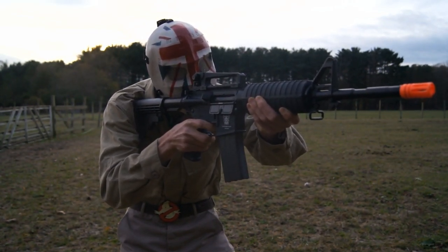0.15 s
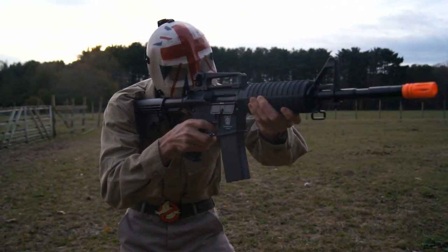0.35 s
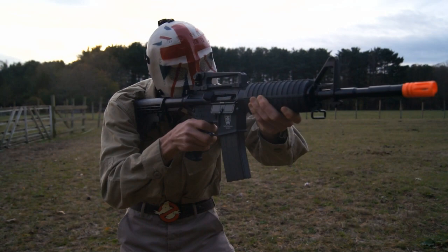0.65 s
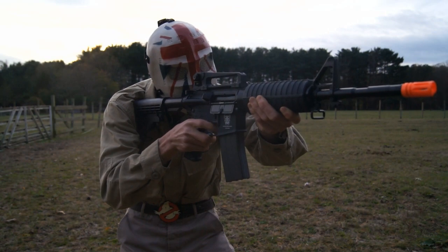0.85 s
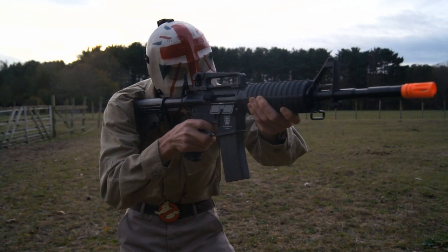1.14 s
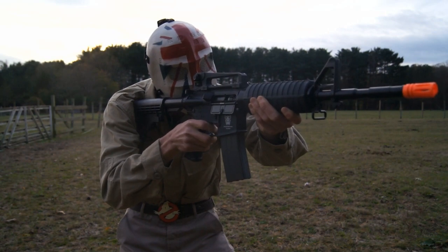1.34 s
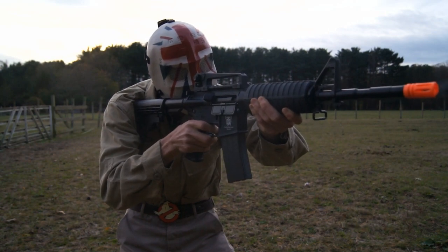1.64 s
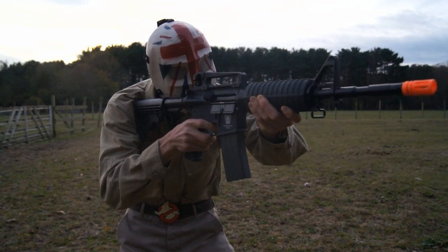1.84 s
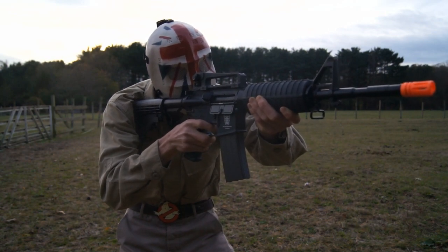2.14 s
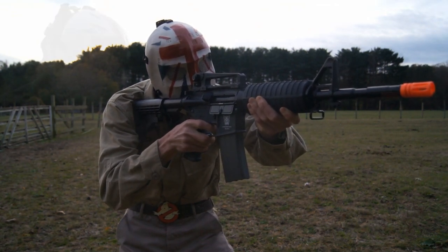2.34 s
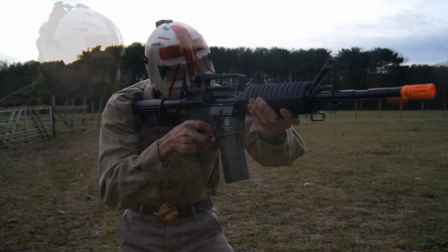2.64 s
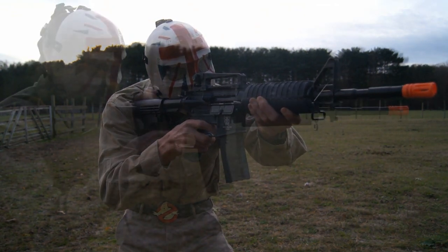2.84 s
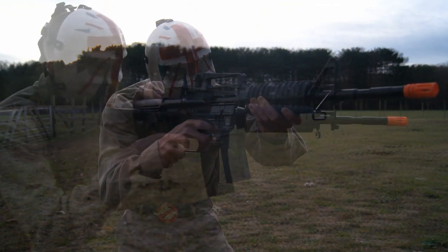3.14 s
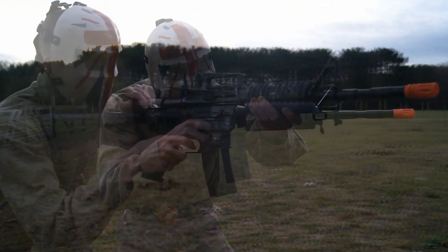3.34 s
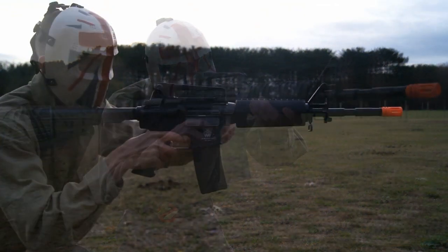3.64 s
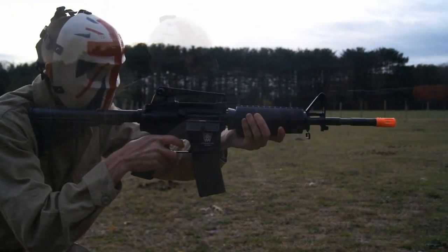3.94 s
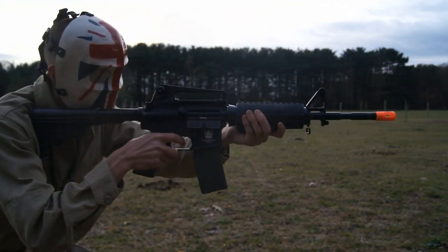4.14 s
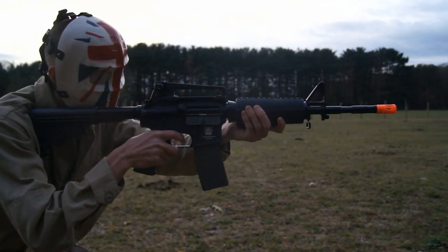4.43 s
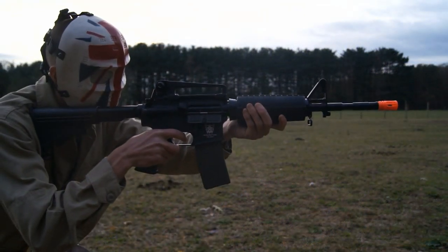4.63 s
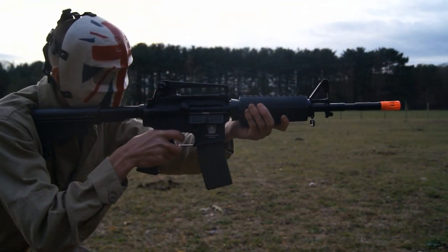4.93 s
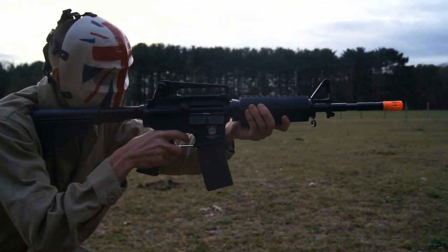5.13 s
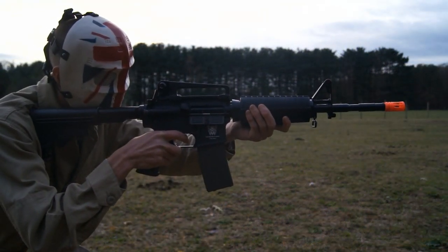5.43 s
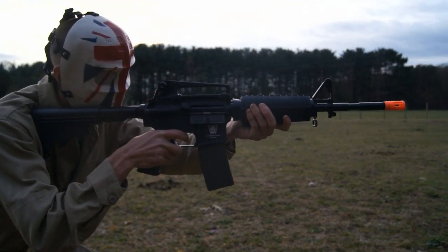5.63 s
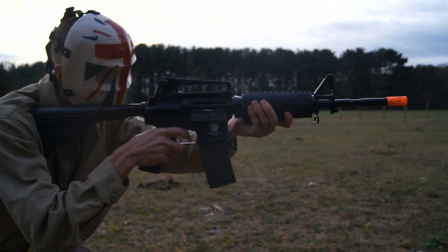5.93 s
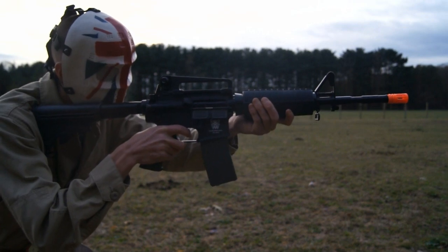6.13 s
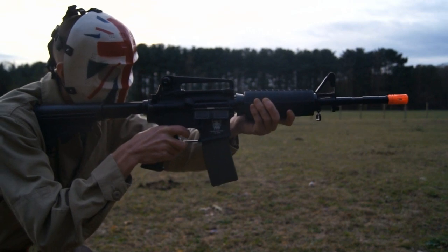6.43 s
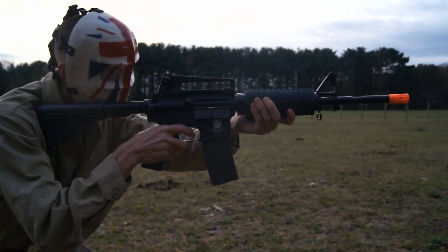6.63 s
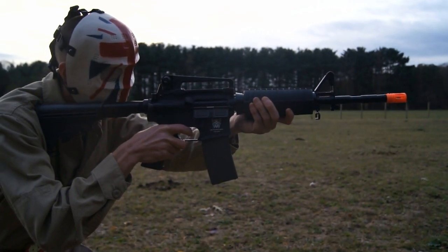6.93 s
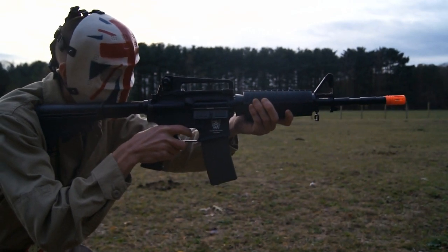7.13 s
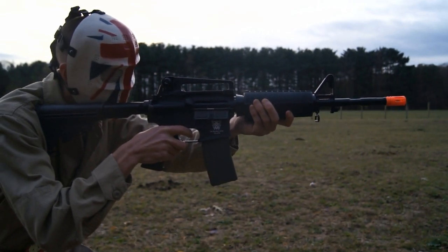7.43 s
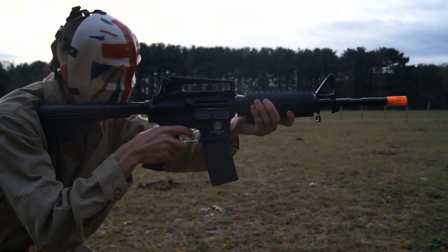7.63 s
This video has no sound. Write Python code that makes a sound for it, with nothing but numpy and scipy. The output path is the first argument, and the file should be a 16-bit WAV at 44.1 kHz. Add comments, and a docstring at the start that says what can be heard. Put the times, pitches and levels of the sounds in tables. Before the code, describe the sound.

An airsoft rifle clacks once at the start, rattles off two quick bursts, is cocked by hand, then fires two spaced single shots in an open field.

```python
"""In an open field, a gas blowback airsoft rifle cycles once, fires two short bursts, is cocked by hand, then fires two
single shots. Each shot is a hammer blow, a rush of gas and a bolt hitting its rear stop and slamming home: shaped noise
for the blows, gas and scrapes, fading sine waves for the ringing metal. The trigger clacks back after the single shots.
The field answers with a faint tail of fading noise, over a low outdoor rumble of filtered noise.
A microphone notches the sound and rounds its peaks."""
import sys
import numpy as np
from scipy import signal
from scipy.fft import rfft, irfft, next_fast_len
from scipy.io import wavfile
from scipy.ndimage import uniform_filter1d, map_coordinates

SR = 44100
rng = np.random.default_rng(int(sys.argv[2]) if len(sys.argv) > 2 else 0)


def int16_out(signal):
    """Quantize to a 16-bit WAV file."""
    q = np.round(np.clip(np.atleast_2d(signal).T, -1, 1) * 32767)
    wavfile.write(sys.argv[1], SR, q.astype(np.int16))


N = 342657  # length in samples
HZ = np.fft.rfftfreq(8192, 1 / SR)  # frequencies at which filters are drawn
T = np.arange(round(.25 * SR)) / SR  # time inside one short sound, s

# Event levels are set before the layer trims in the functions; spectra and modes hold relative levels.
# one cycle of the action per shot: [hammer t/s, hammer strength/dB, rear stop t/s, stop strength/dB,
# bolt home t/s, home strength/dB, gas level/dB, gas lead before the hammer/s, hollow body boost/dB]
SHOT_CYCLES = [(.004, -16, .012, -17, .0442, 0, -40, .004, -2),
               (.509, -2, .531, 0, .5706, 0, -23, .005, 1.5), (.581, 0, .6037, -3, .6418, 0, -27, .006, 1),
               (.6532, -2, .677, -16, .7194, 0, -28, .006, 0),
               (.7291, 0, .753, -17, .7882, 0, -30, .006, -1),
               (.795, 0, .8176, 0, .8578, -1, -33, .004, -1), (1.3754, 0, 1.398, 1, 1.437, 0, -28, .005, 0),
               (1.443, -3, 1.476, -9, 1.5166, 1, -28, .004, 0),
               (1.5276, -3, 1.55, -15, 1.5916, -1, -27, .006, -1),
               (1.6013, 2, 1.6247, -15, 1.6664, -1, -27, .006, -2),
               (1.676, 1, 1.7037, -12, 1.7232, -9, -27, .006, -3),
               (1.7304, -2, 1.7539, 2, 1.7941, -1, -24, .011, 2),
               (4.9031, 0, 4.914, 1, 4.9517, 0, -23, .008, 5),
               (6.4865, 0, 6.5032, 1, 6.5408, 1, -24, .005, 4)]
# contacts at each stage: [delay/s, steel crack level/dB, receiver knock level/dB, low thump level/dB]
# the hammer strikes the valve and rebounds
HAMMER_CONTACTS = [(0, -16.7, -22.3, -37), (.006, -29.5, -29.5, -42.5)]
# the bolt hits the buffer and rebounds
REAR_STOP_CONTACTS = [(0, -14.8, -26, -27.5), (.0055, -24.5, -27.3, -41.5)]
# the bolt slams shut, chatters and settles
HOME_CONTACTS = [(0, -12.7, -26.5, -42), (.005, -25, -30, -44), (.012, -38, -32, -49),
                 (.028, -39, -42, -62)]
# loss for each dB of a weaker blow: [crack loss/dB, knock loss/dB, thump loss/dB]
SOFTENING = (1, .75, 1.4)

# the trigger resetting after a single shot: [t/s, click level/dB, hollow knock level/dB, steel crack level/dB]
TRIGGER_RESETS = [(5.0666, -21.3, -23, -33), (6.659, -22.3, -21.5, -33)]
# single ticks of loose parts and pellets, loud and faint, at set times: [t/s, level/dB]
SET_TICKS = [(.1453, -32), (.242, -39), (.2738, -43.5), (.3331, -37.5), (1.0135, -48.5), (1.0499, -40),
             (1.3517, -51), (1.855, -45), (2.069, -46), (3.07, -61), (3.2224, -53), (3.783, -56)]
# spells of chance ticking: [t/s, length/s, level/dB]
TICK_SPELLS = [(.11, .29, -48), (1.0, .12, -51), (1.88, .32, -53)]
# the rifle shifting in the hands: [t/s, level/dB, length/s]
HAND_RATTLES = [(.0, -39, .06), (.1, -55, 0.091), (.26, -57.5, 0.13), (2.077, -46, 0.043),
                (3.215, -57, 0.06), (3.59, -58, .05)]
# the charging handle knocking along its track: [t/s, steel crack level/dB, receiver knock level/dB, thump level/dB]
HANDLE_BLOWS = [(3.247, -39.5, -41.5, -54), (3.2738, -35, -34, -59), (3.296, -23.3, -22.5, -52),
                (3.305, -34, -26, -48), (3.516, -32, -27, -56), (3.5206, -20, -16.5, -59),
                (3.531, -20.5, -24, -55)]
# the handle sliding back, then forward: [t/s, level/dB, length/s]
HANDLE_SLIDES = [(3.27, -46, .026), (3.503, -35, .053)]
# the handle ringing as it is pulled and let go: [t/s, level/dB]
HANDLE_RINGS = [(3.2965, -35), (3.531, -27)]
# the handle's release jolting the stock: [t/s, level/dB]
STOCK_JOLTS = [(3.519, -43)]
# level of the outdoor air: [t/s, level/dB]
AIR_LEVEL = [(0, -55), (2.2, -55.5), (3.0, -59), (3.6, -57), (7.8, -56.7)]
# single soft low buffets at set times: [t/s, level/dB, length/s]
SET_BUFFETS = [(2.08, -60, .04), (2.32, -52.5, 0.033), (2.55, -57, .095), (3.21, -55.5, 0.2)]
# spells of fainter chance buffets: [t/s, length/s, level/dB]
BUFFET_SPELLS = [(2.0, 1.6, -62), (4.3, 1.7, -62.5)]

# ringing of the spring and bolt carrier: [f/Hz, level/dB, t60/s], t60 being the time to fade by 60 dB
SPRING_MODES = [(3015, -4.5, .12), (3978, -3.5, 0.094), (4660, -3, .1), (5190, 5, .11), (6870, -7, 0.11),
                (7290, -1.5, 0.091), (8900, -9, .11), (10900, -10.5, .12), (10900, -7, 0.078)]
# ringing of the hollow receiver and magazine: [f/Hz, level/dB, t60/s]
RECEIVER_MODES = [(420, -13, 0.016), (800, 0, 0.029), (995, 2, 0.031), (1176, 1, 0.022), (1860, -11, 0.028)]
# ringing of the trigger housing: [f/Hz, level/dB, t60/s]
HOUSING_MODES = [(530, -17.5, 0.031), (827, -4, 0.032), (1000, 1, 0.022), (1171, -2, .028),
                 (1775, -10.5, 0.023)]
# ringing of the charging handle: [f/Hz, level/dB, t60/s]
HANDLE_MODES = [(1040, -2, .09), (1650, -3, .12), (2750, -6, .06), (3305, -7, .06), (4760, -11, .06),
                (5200, -3, .06)]

# crack of steel on steel: [f/Hz, level per Hz/dB]
CRACK_SPECTRUM = [(200, -50), (900, -14), (1700, -6.5), (2800, 2.5), (4100, 2.5), (5500, -3.5), (7000, -5),
                  (8500, -12), (12500, -15), (16000, -29.5)]
# knock on the receiver: [f/Hz, level per Hz/dB]
KNOCK_SPECTRUM = [(150, -34), (400, -12), (750, -1.5), (1100, 1), (1900, -1), (3000, -20.5), (6000, -42.5)]
# low thump of a blow: [f/Hz, level per Hz/dB]
THUMP_SPECTRUM = [(25, -27), (80, -24), (160, -13), (270, -6), (390, 3), (550, 0), (900, -17.5),
                  (2500, -44.5)]
# hiss of gas, also used for feeding and hand rattles: [f/Hz, level per Hz/dB]
HISS_SPECTRUM = [(40, -23.5), (150, -26), (400, -4), (1000, 5), (1900, 3), (4200, -2.5), (7000, -5),
                 (9000, -9.5), (13000, -14.5), (16000, -25)]
# click of the trigger: [f/Hz, level per Hz/dB]
CLICK_SPECTRUM = [(500, -27), (2000, -15), (2700, -11), (3150, -5), (3550, -10), (4050, 5), (4450, 1),
                  (4800, -11), (6500, -12.5), (9000, -23), (15000, -32)]
# tick of small loose parts: [f/Hz, level per Hz/dB]
TICK_SPECTRUM = [(500, -23), (2500, -14), (4500, -1.5), (6500, -0.5), (9000, -7), (13000, -10.5),
                 (16000, -18.5)]
# scrape of sliding metal, also used for the spring's buzz: [f/Hz, level per Hz/dB]
SCRAPE_SPECTRUM = [(150, -23), (400, -7.5), (900, 1), (1900, -1), (3000, 0), (4400, 1), (5800, -5),
                   (7100, -5), (8200, -13), (11000, -13), (16000, -29)]
# shove of the stock: [f/Hz, level per Hz/dB]
SHOVE_SPECTRUM = [(25, 0), (70, 0), (130, -3), (220, -9), (500, -30), (1500, -55)]
# distant outdoor wash: [f/Hz, level per Hz/dB]
AIR_SPECTRUM = [(25, -9.5), (90, -15.5), (210, -5), (450, -5), (800, 1), (1100, -3.5), (1500, -10.5),
                (2000, -15.5), (2900, -13.5), (3700, -18), (4500, -13), (5300, -22.5), (9000, -33),
                (16000, -43.5)]
# soft low buffets: [f/Hz, level per Hz/dB]
BUFFET_SPECTRUM = [(40, -8), (110, -8), (190, 5.5), (330, -0.5), (480, -3.5), (900, -46)]

# tone of the field's answer: [f/Hz, level/dB]
FIELD_TONE = [(100, -9.5), (400, -0.5), (1000, -0.5), (4500, -2), (9000, 4), (15000, -7.5)]
# fading of the field's answer: [f/Hz, t60/s]
FIELD_T60 = [(100, .5), (1000, 0.78), (4000, 0.75), (8000, 0.44), (15000, 0.32)]
# left-right likeness of the rifle: [f/Hz, likeness/0-1]
RIFLE_LIKENESS = [(50, .7), (130, .85), (300, .97), (700, .95), (1300, .86), (2200, .72), (3500, .33),
                  (7000, .3), (15000, .42)]
# left-right likeness of the air and the tail: [f/Hz, likeness/0-1]
AIR_LIKENESS = [(40, .4), (130, 0.5), (300, 0.74), (700, .85), (1400, 0.55), (3100, 0.16), (10000, .1)]
# where the rifle stands: [t/s, lead of the right ear/s, right over left/dB]
RIFLE_PLACE = [(2.5, 0.0000037, 0.5), (3.5, 0, -0.5)]
# microphone balance: [f/Hz, left over right/dB]
MIC_BALANCE = [(60, -3.5), (200, -2), (800, 0.95), (2400, -0.5), (4400, -1.45), (8000, -0.5), (15000, -5)]
# microphone notches: [f/Hz, width/Hz, level/dB]
MIC_NOTCHES = [(606, 70, -7), (1375, 130, -11.5), (2373, 160, -12), (3436, 230, -6)]
EDGE_HZ = 16600  # upper limit of the microphone's sound

GAS_S = .015  # the gas flows this long before dying away
SLIDE_DB, SLIDE_FOLLOW = -37, .25  # bolt scrape; its dB per dB of the blow at the rear stop
JOSTLE_DB, JOSTLE_SPREAD_DB = -32.5, 4.5  # light contacts of the travelling bolt; spread either way
FEED_DB, FEED_LEAD_S, FEED_S = -27.5, .006, .007  # pellet feeding; lead is before the bolt is home
SPRING_DB, SPRING_DAMPED_DB, REFIRE_S = -37.5, -2, .02  # extra dB if the next hammer falls within REFIRE_S
BUZZ_DB, BUZZ_S = -46, .035  # spring coils buzzing against the tube
SHOVE_DB, SHOVE_FOLLOW = -63, 3.7  # shove on the shoulder; its dB per dB of hollow body boost
TICKS_PER_S, TICK_SPREAD_DB = 16, 3
BUFFETS_PER_S, BUFFET_SPREAD_DB, BUFFET_S = 3, 1.5, .035
HOUSING_LOW_HZ = 450  # low cut that keeps the housing's ring free of low thump

# the columns of the shot cycles, one value per shot
HAMMER_S, HAMMER_DB, STOP_S, STOP_DB, HOME_S, HOME_DB, GAS_DB, GAS_LEAD_S, BODY_DB = np.transpose(SHOT_CYCLES)
EACH_SHOT = np.ones(len(SHOT_CYCLES))
REFIRED = np.r_[HAMMER_S[1:], np.inf] - HOME_S < REFIRE_S  # the next shot follows at once


def amp(db):
    """Turns decibels into gain."""
    return 10 ** (np.asarray(db) / 20)


def read(points, hz):
    """Reads a table's value at hz, along a log-frequency axis."""
    f, value = np.transpose(points)
    return np.interp(np.log(hz + 1), np.log(f + 1), value)


def add(mix, s, sound):
    """Lays a sound into the mix at time s."""
    part = mix[:, max(round(s * SR), 0):][:, :sound.shape[-1]]
    part += sound[..., :part.shape[1]]


def causal(x, db):
    """Filters by a dB curve over HZ; nothing sounds ahead of an attack."""
    log_gain = np.log(amp(np.r_[db, db[-2:0:-1]]))
    # the phase that belongs to this loudness curve when sound leaves as early as possible
    response = np.exp(np.conj(signal.hilbert(log_gain)))
    taps = irfft(response[:len(HZ)])
    return signal.oaconvolve(x, taps[None, :len(HZ)], axes=1)[:, :N]


def colour(x, spectrum):
    """Gives white noise a spectrum and keeps its power."""
    db = read(spectrum, HZ)
    return causal(x, db - 10 * np.log10(np.mean(amp(db) ** 2)))


def pair(x, likeness):
    """Blends two unrelated signals so that left and right are as alike as the table says at each frequency."""
    size = next_fast_len(N, True)
    same = np.clip(read(likeness, np.fft.rfftfreq(size, 1 / SR)), 0, 1)
    gains = np.sqrt([(1 + same) / 2, (1 - same) / 2])
    mid, side = irfft(rfft(x, size) * gains, size)[:, :N]
    return np.array([mid + side, mid - side])


def scattered(spells, per_s, spread_db):
    """Spreads chance events loosely through each spell, as rows of (t/s, level/dB)."""
    rows = []
    for start, length, db in spells:
        place, strength = rng.random((40, 2)).T
        after = (np.arange(len(place)) + place) / per_s
        levels = db + spread_db * (2 * strength - 1)
        rows += list(np.c_[start + after, levels][after < length])
    return np.reshape(rows, (-1, 2))


def strikes(rows, spectrum, fall_s, rattle_db, rattle_s, shared_db=-20):
    """Each blow is a dense clatter that dies fast, then a weaker rattle; the same parts give blows a shared grain."""
    out, t = np.zeros((2, N)), T[:len(T) // 2]
    shape = np.exp(-t / fall_s) + amp(rattle_db) * np.exp(-t / rattle_s)
    shared = amp(shared_db) * rng.standard_normal((2, len(t)))
    clatter = shape * (shared + rng.standard_normal((len(rows), 2, len(t))))
    blows = colour(clatter.reshape(-1, len(t)), spectrum)
    # every blow carries the same energy before its own level
    blows *= np.linalg.norm(shape) / np.linalg.norm(blows, axis=1, keepdims=True)
    for (s, db), blow in zip(rows, blows.reshape(len(rows), 2, -1)):
        add(out, s, amp(db) * blow)
    return out


def rushes(rows, spectrum, rise_s, fall_s, grain_db, size):
    """Noise opens quickly, sputters for its length and dies away; size is the sputter's smoothing in samples."""
    out = np.zeros((2, N))
    for s, db, length in rows:
        shape = (1 - np.exp(-T / rise_s)) * np.exp(-np.maximum(T - length, 0) / fall_s)
        wander = np.sqrt(size) * uniform_filter1d(rng.standard_normal(len(T)), size)
        sputter = amp(grain_db * wander)
        sputter /= np.sqrt(np.mean(sputter ** 2))
        add(out, s, amp(db) * shape * sputter * rng.standard_normal((2, len(T))))
    return colour(out, spectrum)


def rings(rows, modes, scatter, rise_s):
    """Blows ring a set of fading sine waves, with pitches scattered a little each time."""
    out = np.zeros((2, N))
    hz, mode_db, t60 = np.transpose(modes)[:, :, None]
    t = T[T < t60.max()]
    size = amp(mode_db) / np.linalg.norm(amp(mode_db))
    shape = size * (1 - np.exp(-t / rise_s)) * np.exp(-np.log(1000) * t / t60)
    for s, db in rows:
        pitch = hz * (1 + scatter * rng.standard_normal(hz.shape))
        turns = pitch * t + rng.random((2, *hz.shape))
        ring = (shape * np.sin(2 * np.pi * turns)).sum(1)
        ring *= np.linalg.norm(shape) / np.linalg.norm(ring, axis=1, keepdims=True)
        add(out, s, amp(db) * ring)
    return out


def outdoors():
    """A nearly steady distant wash of filtered noise with soft low buffets."""
    level_db = np.interp(np.arange(N) / SR, *np.transpose(AIR_LEVEL))
    air = amp(level_db) * colour(rng.standard_normal((2, N)), AIR_SPECTRUM)
    chance = scattered(BUFFET_SPELLS, BUFFETS_PER_S, BUFFET_SPREAD_DB)
    rows = SET_BUFFETS + [(s, db, BUFFET_S) for s, db in chance]
    buffets = rushes(rows, BUFFET_SPECTRUM, rise_s=.01, fall_s=.015, grain_db=2.3, size=400)
    return pair(air + buffets, AIR_LIKENESS)


def handling():
    """Loose parts and pellets tick, and the rifle rattles as it shifts in the hands."""
    rows = np.vstack([SET_TICKS, scattered(TICK_SPELLS, TICKS_PER_S, TICK_SPREAD_DB)])
    ticks = amp(2) * strikes(rows, TICK_SPECTRUM, fall_s=.0012, rattle_db=-14.5, rattle_s=0.014)
    return ticks + rushes(HAND_RATTLES, HISS_SPECTRUM, rise_s=.006, fall_s=0.023, grain_db=3.5, size=130)


def gas_rush():
    """Gas let out by the valve rushes in turbulent noise, starting just ahead of the hammer's main blow."""
    rows = np.c_[HAMMER_S - GAS_LEAD_S, GAS_DB, GAS_S * EACH_SHOT]
    return rushes(rows, HISS_SPECTRUM, rise_s=.004, fall_s=.004, grain_db=4.5, size=70)


def contacts(stage, times, force_db):
    """Lists one stage of every shot as blows; a hollow body lifts knock and thump."""
    shift = np.c_[times, np.outer(force_db, SOFTENING) + np.outer(BODY_DB, [0, 1, 1])]
    return np.vstack([shift + contact for contact in stage])


def impacts(blows):
    """Metal hits metal: a steel crack, a knock that rings the receiver, and a low thump."""
    crack_rows, knock_rows, thump_rows = blows[:, [0, 1]], blows[:, [0, 2]], blows[:, [0, 3]]
    crack = strikes(crack_rows, CRACK_SPECTRUM, fall_s=.0017, rattle_db=-16, rattle_s=.010, shared_db=-3.5)
    knock = strikes(knock_rows, KNOCK_SPECTRUM, fall_s=.0028, rattle_db=-15, rattle_s=.016)
    body = rings(knock_rows, RECEIVER_MODES, scatter=0.04, rise_s=0.00058)
    thump = strikes(thump_rows, THUMP_SPECTRUM, fall_s=0.0049, rattle_db=-20, rattle_s=.012)
    return amp(3) * crack + amp(-.4) * knock + amp(-1) * thump + amp(-.6) * body


def hammer_and_bolt():
    """The hammer strikes the valve, then the bolt hits its rear stop and slams home."""
    hammer = contacts(HAMMER_CONTACTS, HAMMER_S, HAMMER_DB)
    rear_stop = contacts(REAR_STOP_CONTACTS, STOP_S, STOP_DB)
    home = contacts(HOME_CONTACTS, HOME_S, HOME_DB)
    return impacts(np.vstack([hammer, rear_stop, home]))


def stock_shove():
    """The stock shoves the shoulder with a low thud at each hammer fall."""
    rows = np.c_[HAMMER_S, SHOVE_DB + SHOVE_FOLLOW * BODY_DB]
    return strikes(rows, SHOVE_SPECTRUM, fall_s=.006, rattle_db=-23, rattle_s=.012)


def bolt_scrape():
    """The bolt scrapes along its track from hammer fall until it is home."""
    rows = np.c_[HAMMER_S, SLIDE_DB + SLIDE_FOLLOW * STOP_DB, HOME_S - HAMMER_S]
    return rushes(rows, SCRAPE_SPECTRUM, rise_s=.007, fall_s=.005, grain_db=3, size=160)


def bolt_jostles(count):
    """The bolt jostles in its track: light steel contacts at chance moments of each cycle."""
    place, strength = np.moveaxis(rng.random((len(HAMMER_S), count, 2)), -1, 0)
    progress = (np.arange(count) + place) / count
    times = HAMMER_S[:, None] + (HOME_S - HAMMER_S)[:, None] * progress
    level_db = JOSTLE_DB + JOSTLE_SPREAD_DB * (2 * strength - 1)
    rows = np.c_[times.ravel(), level_db.ravel()]
    return strikes(rows, CRACK_SPECTRUM, fall_s=.0013, rattle_db=-22, rattle_s=.008)


def pellet_feed():
    """The bolt shoves a pellet into the chamber just before it is home, as a short rush of noise."""
    rows = np.c_[HOME_S - FEED_LEAD_S, FEED_DB * EACH_SHOT, FEED_S * EACH_SHOT]
    return rushes(rows, HISS_SPECTRUM, rise_s=.004, fall_s=.005, grain_db=4, size=70)


def spring_ring():
    """The spring rings as the bolt slams home; its coils buzz unless the next shot follows at once."""
    ring_rows = np.c_[HOME_S, SPRING_DB + BODY_DB + SPRING_DAMPED_DB * REFIRED]
    ring = rings(ring_rows, SPRING_MODES, scatter=0.0054, rise_s=.002)
    buzz_rows = np.c_[HOME_S, BUZZ_DB * EACH_SHOT, BUZZ_S * EACH_SHOT][~REFIRED]
    return ring + rushes(buzz_rows, SCRAPE_SPECTRUM, rise_s=.005, fall_s=.035, grain_db=3, size=130)


def action():
    """Adds up the moving parts and gas of every shot."""
    moving = hammer_and_bolt() + stock_shove() + bolt_scrape() + bolt_jostles(count=3)
    return gas_rush() + moving + pellet_feed() + spring_ring()


def field(x, wet_db, build_s):
    """Grass, fence and trees scatter a faint tail whose highest treble dies first."""
    hz, t, z = signal.stft(rng.standard_normal((2, SR)), SR, nperseg=256)
    fade = np.exp(-np.log(1000) * t / read(FIELD_T60, hz)[:, None])
    build = 1 - np.exp(-t / build_s)
    z = z * amp(read(FIELD_TONE, hz)[:, None]) * fade * build
    tail = signal.istft(z, SR, nperseg=256)[1]
    tail /= np.linalg.norm(tail[0])
    return amp(wet_db) * pair(signal.fftconvolve(x, tail, axes=1)[:, :N], AIR_LIKENESS)


def charging_handle():
    """The bolt worked by hand: the handle slides, knocks and rings; its release rings the spring and jolts the stock."""
    scrape = rushes(HANDLE_SLIDES, SCRAPE_SPECTRUM, rise_s=.008, fall_s=.005, grain_db=3, size=160)
    ring = rings(HANDLE_RINGS, HANDLE_MODES, scatter=.004, rise_s=.001)
    spring = amp(-1.5) * rings(HANDLE_RINGS[-1:], SPRING_MODES, scatter=.005, rise_s=.002)
    jolt = amp(-1.5) * strikes(STOCK_JOLTS, SHOVE_SPECTRUM, fall_s=.006, rattle_db=-23, rattle_s=.012)
    return impacts(np.array(HANDLE_BLOWS)) + scrape + ring + spring + jolt


def trigger_resets():
    """The trigger snaps back: a click with an edge of steel, and the small hollow housing answers a moment later."""
    snaps = np.array(TRIGGER_RESETS)
    click = amp(1.5) * strikes(snaps[:, [0, 1]], CLICK_SPECTRUM, fall_s=0.0018, rattle_db=-29, rattle_s=0.0065)
    edge = amp(3) * strikes(snaps[:, [0, 3]], CRACK_SPECTRUM, fall_s=.0015, rattle_db=-24, rattle_s=.008)
    housing_rows = snaps[:, [0, 2]] + [.0003, 0]  # delay in s
    housing = amp(5.5) * rings(housing_rows, HOUSING_MODES, scatter=0.014, rise_s=0.0006)
    low_cut = signal.butter(2, HOUSING_LOW_HZ, "high", fs=SR, output="sos")
    return click + edge + signal.sosfilt(low_cut, housing)


def placed(x):
    """Sets the rifle a little to the right at first, then to the left, almost wholly by level."""
    n = np.arange(N)
    s, lead_s, side_db = np.transpose(RIFLE_PLACE)
    lead = np.interp(n / SR, s, lead_s) * SR  # in samples
    side = amp(np.interp(n / SR, s, side_db) / 2)
    left = map_coordinates(x[0], [n - lead], order=5) / side
    return np.array([left, x[1] * side])


def scene():
    """The rifle close by, its tail over the field, and the outdoor air."""
    air = outdoors()
    rifle = placed(pair(handling() + action() + charging_handle() + trigger_resets(), RIFLE_LIKENESS))
    return air + rifle + field(rifle, wet_db=-25.5, build_s=0.013)


def record(dry):
    """The microphone's notches and balance, soft overload on the sharpest peaks, and the band limit."""
    notch_db = sum(db * np.exp(-((HZ - hz) / width) ** 2) for hz, width, db in MIC_NOTCHES)
    lean_db = read(MIC_BALANCE, HZ) / 2
    heard = np.vstack([causal(dry[:1], notch_db + lean_db), causal(dry[1:], notch_db - lean_db)])
    ceiling = amp(-6)
    rounded = ceiling * np.tanh(amp(1.0) * heard / ceiling)
    band_limit = signal.firwin(127, EDGE_HZ, window=("kaiser", 8), fs=SR)
    return signal.oaconvolve(rounded, band_limit[None], "same")


dry = scene()
out = record(dry)
int16_out(out)
```